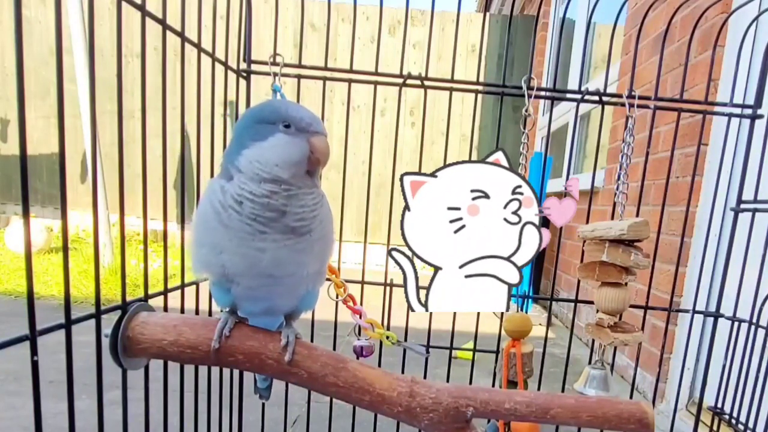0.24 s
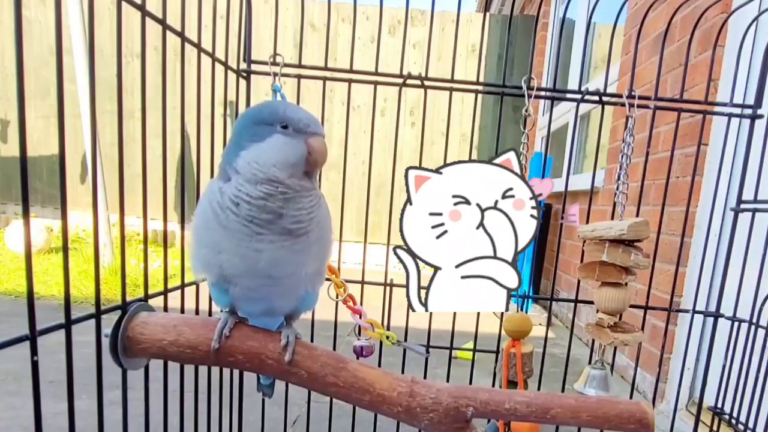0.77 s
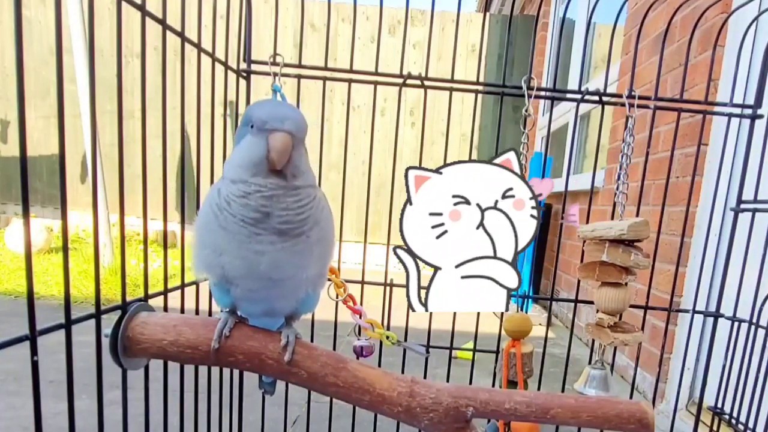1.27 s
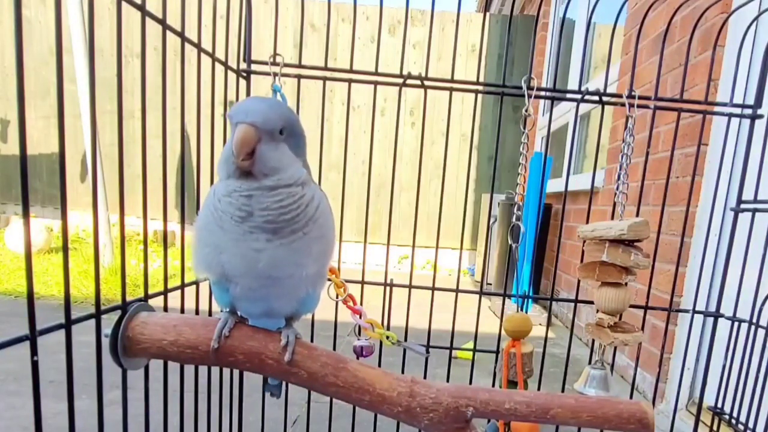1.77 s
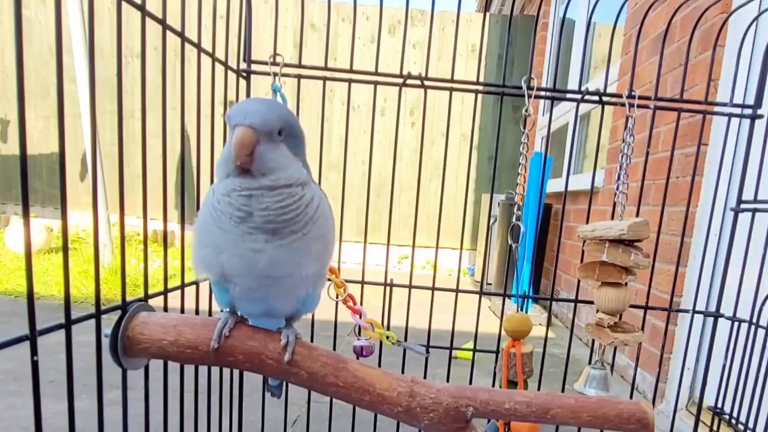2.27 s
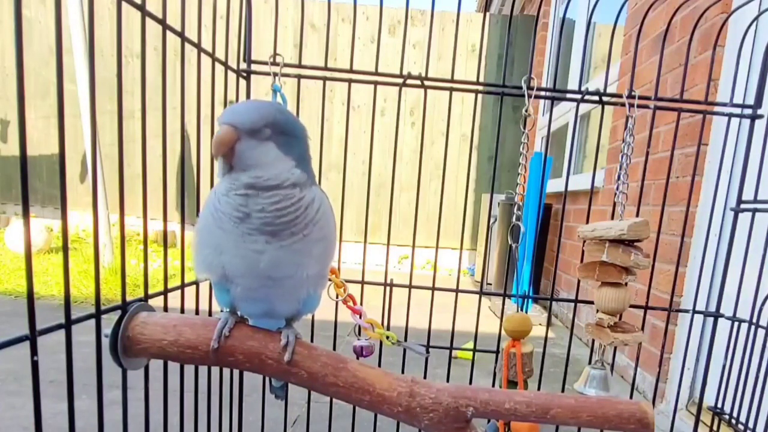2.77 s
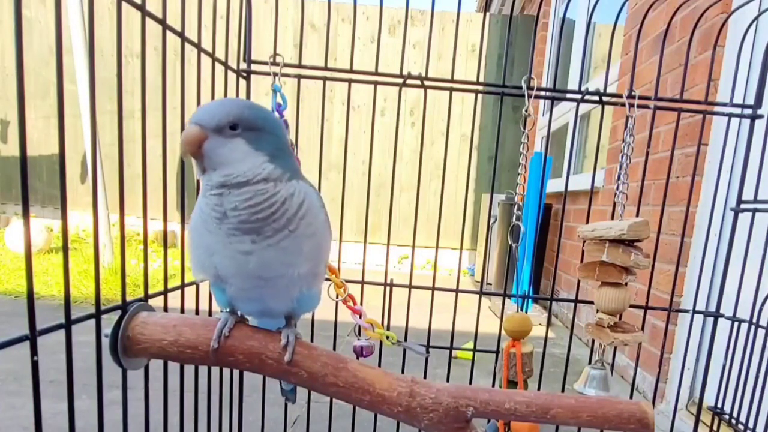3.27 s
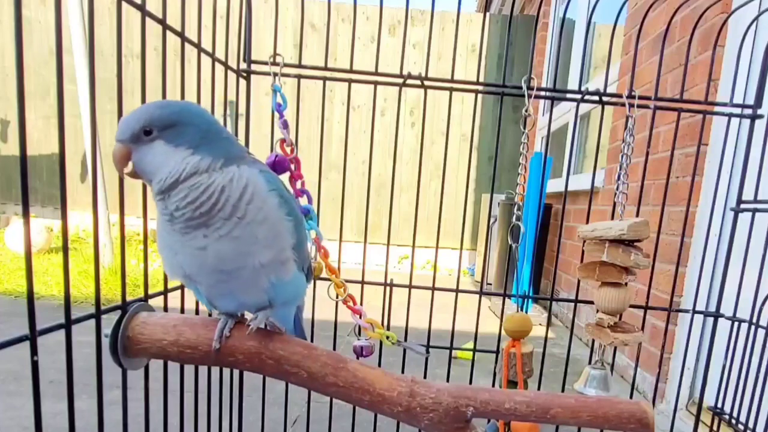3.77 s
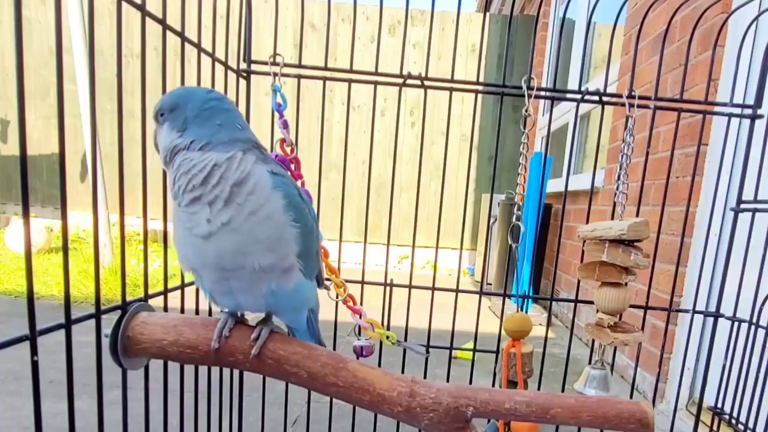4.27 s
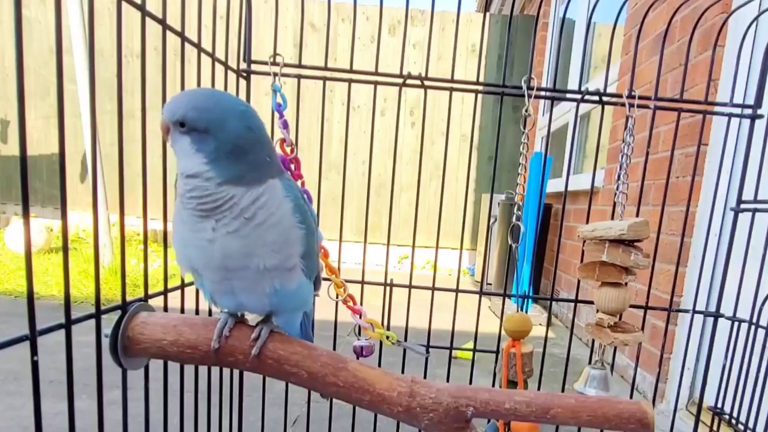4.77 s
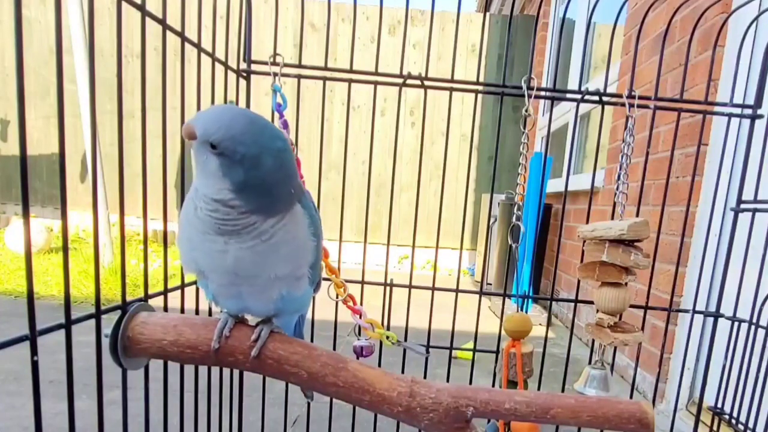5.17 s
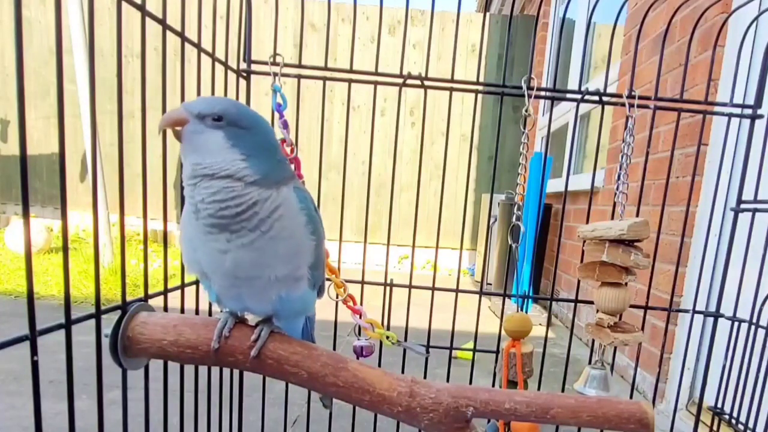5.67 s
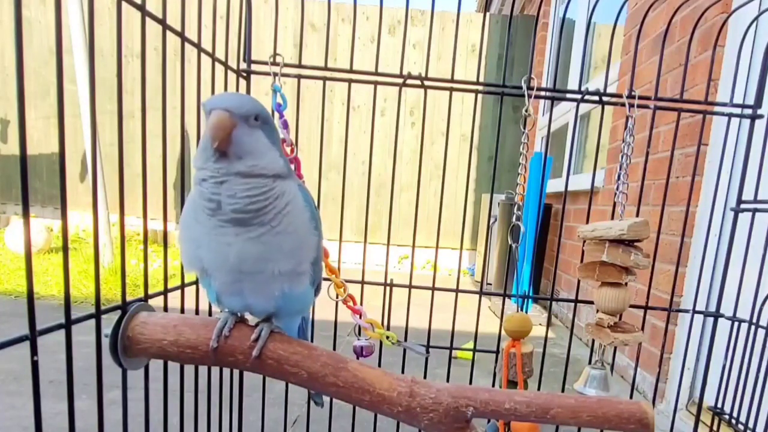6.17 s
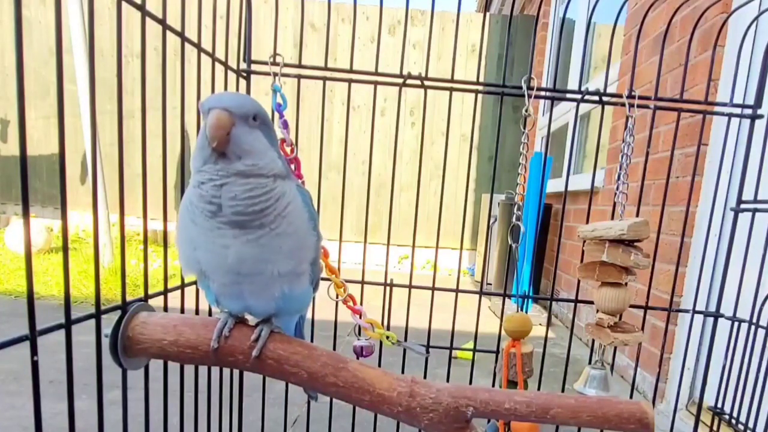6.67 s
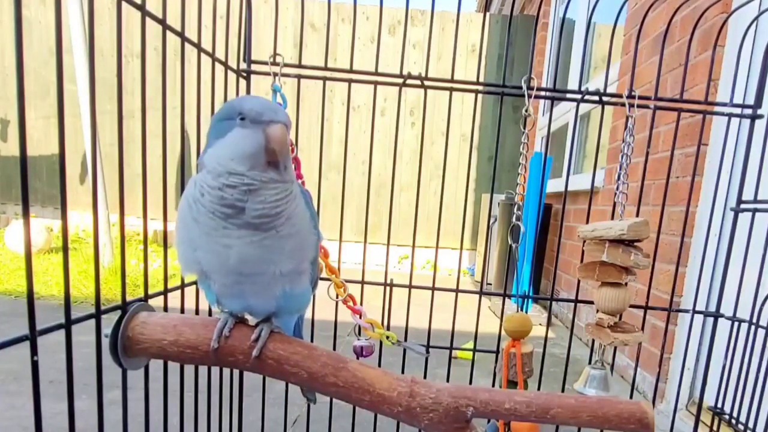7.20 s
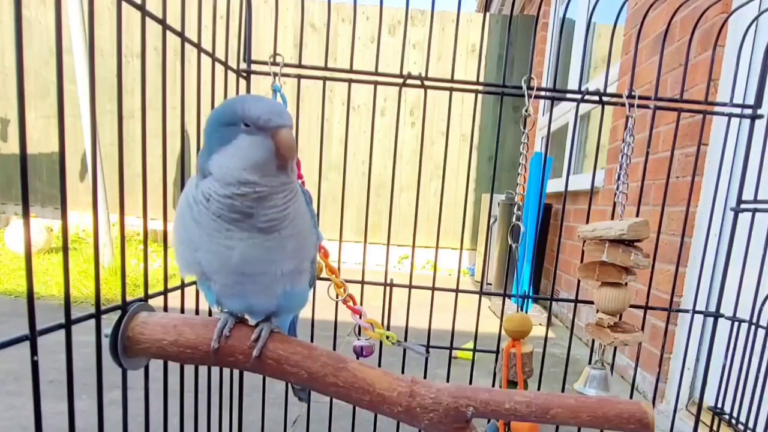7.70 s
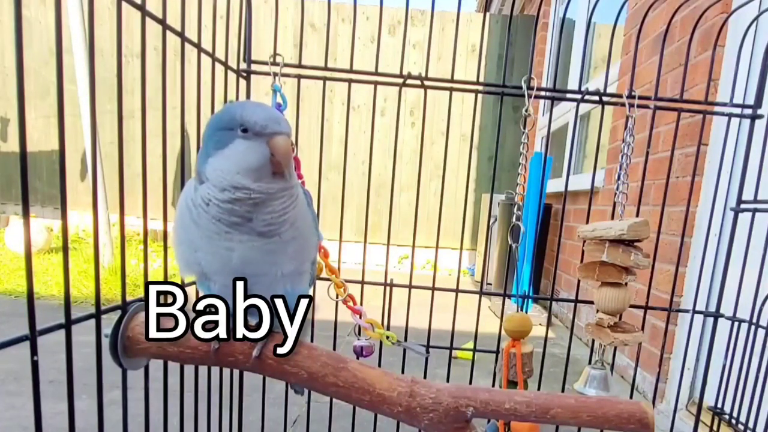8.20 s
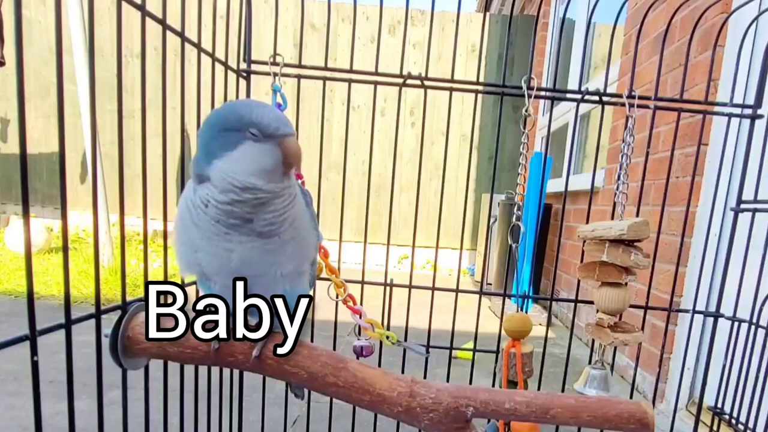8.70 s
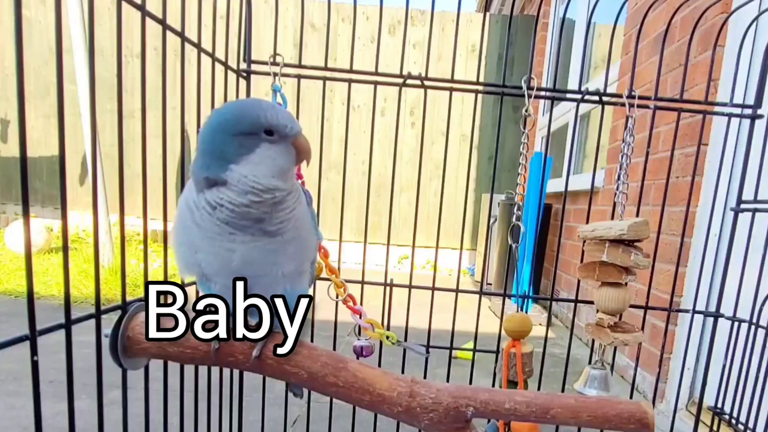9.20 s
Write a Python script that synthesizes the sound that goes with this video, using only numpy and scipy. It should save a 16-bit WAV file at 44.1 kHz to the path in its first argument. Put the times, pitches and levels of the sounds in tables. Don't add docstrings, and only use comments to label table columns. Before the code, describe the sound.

A small parrot chatters very close to the microphones in an outdoor cage, slightly left: short croaks, clicks, raspy squawks, a bright squeal, then a hollow whistle and a round hoot. Calls thin out after six seconds, leaving two rough grates near eight. Low street rumble and a passing engine drone lie beneath, with faint echoing sparrows, late feather rustle and a second engine revving.

```python
import sys
import numpy as np
from scipy import signal
from scipy.fft import rfft, irfft
from scipy.io import wavfile
from scipy.ndimage import uniform_filter1d

SR = 44100
rng = np.random.default_rng(int(sys.argv[2]) if len(sys.argv) > 2 else 0)


def dump(signal):
    limited = np.clip(np.atleast_2d(signal).T, -1, 1)
    pcm = np.round(limited * 32767).astype(np.int16)
    wavfile.write(sys.argv[1], SR, pcm)


def to_linear_factor(level_db):
    exponent = np.asarray(level_db, float) / 20
    return 10 ** exponent


N = 416744

# t/s, rumble level/dB, distant roar level/dB
STREET = [(0, -51, -67), (1.1, -47.5, -56), (2.102, -45, -62), (3.5, -48.5, -67), (4.7, -41.5, -60.5),
          (6.6, -50.5, -68.5), (7.2, -49.5, -70.5), (7.7, -45.5, -66), (9.5, -44, -67.5)]
# f/Hz, level/dB per Hz
RUMBLE = [(12, -53.5), (20, -30.5), (70, 3), (92, -12), (129, -9), (600, -28), (780, -60), (1320, -120)]
ROAR = [(180, -18), (400, -22.5), (700, -27), (1600, -34.5), (2300, -46.5), (4300, -47), (16000, -71)]
# f/Hz, left-right correlation
LIKENESS = [(60, 0.91), (290, 0.93), (640, -0.5), (1400, -0.37), (3100, 0)]
# t/s, firing f/Hz, level/dB, tilt/dB per order
PASSING = [(0, 68.5, -54.5, -3), (1.1, 68.78, -47.5, -4), (1.4, 68.8, -48, -15), (2.1, 62.74, -36, -17.5),
           (2.7, 59.7, -38.5, -6), (3.3, 56.8, -40.5, -7), (3.8, 52.97, -52.5, -3.5),
           (4.8, 50.55, -82.5, 9)]
REVVING = [(8.4, 47.96, -61.5, 2), (8.6, 48.08, -44, 1), (8.7, 54.01, -56, 3), (8.95, 54.64, -68.5, 5.5),
           (9.05, 49.23, -51.5, 0), (9.17, 50.93, -51, -0.5), (9.27, 61.4, -45.5, -1),
           (9.6, 63.7, -43.5, -1.5)]
HUM = [(0, 308, -61, -30), (1.7, 299.5, -58.5, -30.5), (3.4, 280.8, -58, -30.5), (3.9, 279, -75, -30)]
RISING = [(0, 77.65, -50, -30), (.9, 94.3, -53, -30), (1.2, 97, -70, -30)]

# f/Hz, level/dB
THROAT = [(700, -4.5), (2200, 0), (3300, -3.5), (4300, -2.5), (6000, -14), (7800, -3.5), (9800, -9.5),
          (12000, -2), (15500, -22.5)]
# t/s, lead of the left port/samples, left-right level/dB
HEAD = [(0, 10.26, 3.5), (1.5, 11.44, 10.5), (3.2, 12.54, 12.5), (4.3, 14.46, 9.5), (5.4, 13.55, 10.5),
        (6.3, 12.96, 8.5), (8, 11, 7.5)]
# f/Hz, t60/s
WALL = [(500, 0.38), (2500, 0.42), (3800, 0.52), (5500, 0.3), (12000, 0.26)]
# f/Hz, level/dB
BRICK = [(1000, -2), (4300, -0.5), (5300, -6.5), (8000, -1)]
BEND = 0.02

# t/s, length/s, peak effort level/dB, first f/Hz, last f/Hz
CLICKS = [(.445, 0.0055, -47, 910, 930), (.549, 0.0054, -26, 1630, 1640), (.568, .006, -34, 1940, 2050),
          (.584, 0.005, -30.5, 2000, 2050), (1.69, .006, -42, 3512, 3400), (1.955, .006, -40.5, 3489, 3400),
          (2.612, .005, -48, 3500, 3400), (2.042, 0.016, -29, 3913, 3890), (5.079, .017, -24, 1880, 1815),
          (7.861, 0.0078, -32, 2924, 2956)]
RASPS = [(1.478, 0.0081, -29.5, 1308, 1200), (1.596, 0.019, -28.5, 1900, 1015),
         (1.743, 0.023, -24.5, 2290, 1423), (2.069, 0.035, -16.5, 4265, 1937),
         (2.208, 0.016, -27.5, 943, 830), (2.351, 0.034, -15.5, 3857, 2230),
         (2.657, 0.014, -10.5, 3705, 3450), (2.967, 0.0047, -20.5, 2220, 2180),
         (2.976, 0.013, -18, 2386, 1542), (5.373, .014, -15.5, 4300, 2200)]
HISSES = [(4.785, 0.059, -21.5, 2694, 2014), (5.343, .075, -18, 3310, 2080)]
PIPS = [(.554, 0.0178, -47, 1423, 1960), (.585, 0.0088, -45.5, 1970, 2198)]
GRATES = [(7.872, 0.0402, -23, 245.4, 195.3), (7.969, 0.0638, -12.5, 392.7, 368.2)]
CROAKS = [(4.605, .045, -30.5, 560, 792), (5.015, 0.053, -38.5, 700, 545), (.205, .024, -30, 1050, 1600)]
SWELLS = [(1.895, 0.032, -25, 536, 705), (2.535, 0.026, -24.5, 728, 883), (2.815, 0.038, -29, 678, 738.3)]
ARCHES = [(1.616, 0.04, -18.5, 1010, 1019), (2.225, 0.03, -9, 680, 714.5)]
TAILS = [(1.486, 0.0393, -42, 755, 850), (2.102, 0.031, -29, 792, 661)]
DROPS = [(0, 0.023, -41, 1475, 710), (.226, 0.013, -30.5, 1430, 780), (.399, 0.025, -23.5, 1312, 631)]
SAGS = [(1.76, 0.042, -20.5, 1150, 800)]
GRATE_ROUGH = (.45, .34, .45)
# its syllables, then rise and fall of effort, pitch arch,
# roughness at (start, peak, end), beak and chest level/dB, chest filling as effort drops
KINDS = [ (CLICKS, dict(rise_s=0.0011, rise_share=0, rise_db=3, fall_db_per_s=1200, close_db=2, arch=0, rough=(0.27, 0.87, 0.71),
         beak_db=-8, chest_db=3, fill=0.33)),
         (PIPS, dict(rise_s=0.0028, rise_share=0, rise_db=0, fall_db_per_s=102, close_db=-12, arch=0, rough=(0.26, 0.38, 0.3),
         beak_db=-12, chest_db=6, fill=0.088)),
         (RASPS, dict(rise_s=0.0045, rise_share=0.15, rise_db=1, fall_db_per_s=348, close_db=1, arch=0, rough=(0.96, .85, 0.53),
         beak_db=-8.5, chest_db=-5, fill=0.37)),
         (GRATES, dict(rise_s=0.008, rise_share=0.12, rise_db=3, fall_db_per_s=253, close_db=3.5, arch=0, rough=GRATE_ROUGH, beak_db=-8.5, chest_db=-5, fill=0.9)),
         (HISSES, dict(rise_s=0, rise_share=0.51, rise_db=26.5, fall_db_per_s=59, close_db=-1.5, arch=0, rough=(.8, 0.82, .7),
         beak_db=-13.5, chest_db=-1.5, fill=0.35)),
         (CROAKS, dict(rise_s=0, rise_share=0.66, rise_db=22, fall_db_per_s=104, close_db=8.5, arch=0, rough=(0.96, 0.76, 0.88),
         beak_db=-5.5, chest_db=-3.5, fill=0.55)),
         (SWELLS, dict(rise_s=0, rise_share=0.76, rise_db=19.5, fall_db_per_s=3.5, close_db=-3, arch=0, rough=(0.53, 0.26, 0.49),
         beak_db=-0.5, chest_db=2, fill=0.52)),
         (ARCHES, dict(rise_s=0, rise_share=0.47, rise_db=14.5, fall_db_per_s=-5, close_db=4.5, arch=.06, rough=(0.43, .15, 0.5),
         beak_db=-2.5, chest_db=-1, fill=0.93)),
         (TAILS, dict(rise_s=0.0047, rise_share=0, rise_db=6.5, fall_db_per_s=198, close_db=-1.4, arch=0.042, rough=(0.29, 0.42, 0.19),
         beak_db=-1.5, chest_db=2.5, fill=0.61)),
         (SAGS, dict(rise_s=.008, rise_share=0, rise_db=12, fall_db_per_s=200, close_db=5.5, arch=-.12, rough=(.55, 0.35, 0.28),
         beak_db=2, chest_db=3, fill=.7)),
         (DROPS, dict(rise_s=0.0096, rise_share=0, rise_db=6, fall_db_per_s=602, close_db=-1.5, arch=0.1214, rough=(0.7, 0.51, 0.68),
         beak_db=-1.5, chest_db=-4, fill=0.46)), ]
CHEST_PER_OCTAVE_DB, CHEST_HZ = 18, 1500
EASY_DB, CHEST_TOP_DB = -25, 15.5

# t/s, effort level/dB, f/Hz, throat hollow level/dB
SQUEAL = [(2.67, -9, 1123, -24), (2.69, -7.5, 1123, -16), (2.71, -34, 750, 4), (2.73, -44, 696, -9.5)]
SCOOP = [(2.986, -23, 577, -8), (3.02, -39, 553, 10), (3.06, -47, 445, 13), (3.096, -34, 518, 3),
         (3.128, -18, 731, -8.5), (3.148, -19, 737, -2), (3.18, -13.5, 1135, -8), (3.215, -26.5, 1122, 4.5),
         (3.245, -38.5, 1097, -7.5)]
BARK = [(3.791, -20, 1608, -3.5), (3.798, -13.5, 1733, -7), (3.818, -25, 489, 0), (3.845, -69, 487, -21)]
GROAN = [(6.345, -33, 550, -4.5), (6.353, -25.5, 546.3, -3), (6.378, -20, 507.5, -4),
         (6.397, -31, 478, 7.5)]
SLIDE = [(4.258, -46, 1195, 9), (4.275, -25, 1215, -2), (4.3, -28.5, 807.3, 3.5), (4.335, -25.5, 586.6, -1),
         (4.372, -33, 448.5, 6)]
WHISTLE = [(5.408, -30.5, 739, 0.5), (5.422, -17, 738, -6), (5.436, -29, 870, 14.5),
           (5.5, -35.5, 908, 18.5), (5.537, -34.5, 904, 20.5), (5.565, -27, 957.6, 7),
           (5.625, -20, 955.5, 2), (5.71, -29, 834, 11), (5.785, -58, 490, 14.5)]
HOOT = [(6.258, -45, 818, 13), (6.275, -18, 790, -1), (6.3, -9.5, 728, -10.5), (6.33, -15.5, 702, -9.5),
        (6.345, -49.5, 690, -13.5)]
MUTTER = [(4.842, -33, 573, 4.2), (4.862, -37.5, 630, 11.3), (4.89, -47, 660, 16.2), (4.928, -50, 536, 20)]
SLUMP = [(2.395, -34.5, 1653, 7.4), (2.408, -33, 850, 5), (2.432, -36.5, 795, 8.7)]
# call, roughness inside, at the start, at the end,
# beak level/dB, beak change by the end/dB, beak share of the hollow
CALLS_SUNG = [
    (SQUEAL, 0.091, 0.31, 0.7, -3.5, -3.5, .01),
    (SCOOP, 0.14, 0.48, 0.11, -6.5, 1.97, .01),
    (BARK, 0.36, 0.24, 0.82, -7.5, -1.04, 0.0091),
    (SLIDE, 0.43, 0.37, .32, -33, 20.5, .01),
    (WHISTLE, 0.006, 0.51, 2.2, -2.5, -2.5, 0.78),
    (HOOT, .04, 0.1676, 0.98, -14.5, 4, .01),
    (MUTTER, .14, .5, .3, -3, 5, .01),
    (GROAN, 0.14, 1.8, 0.6, -12.5, 0.92, 0.012),
    (SLUMP, .2, 0.46, 0.34, -2.5, 1.5, .01),
]
EDGE_S = 0.016

# t/s, length/s, level/dB, first f/Hz, last f/Hz
SCREAMS = [(0.191, 0.022, -42, 8400, 8500), (.192, .018, -49, 3600, 3000), (4.765, 0.029, -47, 4000, 3600),
           (2.073, 0.048, -22, 4328, 1787), (2.35, 0.05, -17, 4400, 1500), (4.783, 0.07, -24.5, 5600, 4303),
           (5.349, 0.093, -17.5, 5000, 4100), (5.406, .035, -40, 10730, 10400),
           (5.63, 0.071, -28.5, 8800, 8300)]
SCREAM_WIDTH_HZ = 1300
# t/s, length/s, first f/Hz, last f/Hz, lift level/dB
RINGS = [(.0, 0.025, 1300, 750, 5), (.226, 0.013, 1400, 800, 9.5), (.552, .045, 1610, 2000, 6.5),
         (1.484, 0.033, 2970, 3400, 22), (1.62, .04, 3230, 3150, 5.5), (1.62, .04, 4306, 4200, 5),
         (1.755, 0.025, 4800, 3880, 12), (1.77, 0.023, 1800, 1610, 1), (2.228, 0.026, 2120, 2170, 5),
         (2.251, .012, 2650, 2600, 10), (2.352, 0.011, 2600, 2600, 5), (.4, 0.025, 4200, 2620, 7.5),
         (.208, 0.027, 2500, 3230, 9.5), (2.228, 0.026, 4300, 4300, 8.5), (2.535, .03, 3900, 4140, 4),
         (2.67, .035, 2300, 2090, 7), (2.82, .035, 3500, 3800, 9.5), (3.1, 0.058, 3200, 3800, 6.5),
         (3.15, 0.037, 3300, 4200, 3.5), (4.262, 0.027, 2300, 2200, 9), (4.29, 0.065, 2500, 2000, 6),
         (4.8, .045, 2303, 2000, 2), (5.08, 0.022, 2000, 2005, 5.5), (5.345, 0.063, 3300, 2600, 3),
         (5.363, 0.024, 4300, 4170, 12), (5.372, 0.057, 2150, 2150, 9), (5.6, .1, 3860, 3494, 1.5),
         (5.425, 0.13, 1720, 1900, 9), (5.585, 0.15, 1930, 1640, 9), (4.845, .08, 1260, 1150, 3),
         (6.265, 0.077, 2400, 2150, 2.5), (6.29, 0.043, 7400, 7100, 9.5), (6.368, .03, 2100, 2000, 4.5),
         (6.368, 0.029, 3150, 3000, 7.5), (6.36, .035, 7100, 6660, 13), (7.872, 0.048, 2200, 2140, 3.5),
         (7.872, 0.039, 4160, 4160, 11.5), (7.98, 0.042, 2500, 2700, 9), (7.972, 0.062, 4260, 4300, 9),
         (7.972, .03, 7200, 7200, 7.5)]
# t/s, length/s, first f/Hz, last f/Hz, lift level/dB
GAPS = [(.0, 0.025, 2300, 1800, -3), (0.5, .025, 5800, 5800, -11), (1.6, 0.058, 1940, 1800, -6),
        (1.6, .06, 6000, 6300, -13), (2, 0.017, 1000, 601.7, -9), (2.095, .045, 7500, 7500, -12),
        (2.5, 0.017, 1300, 1396, -5.5), (2, 0.05, 1096, 698, -17.5), (2.5, .04, 7004, 7007, -9.5),
        (2.5, 0.041, 5785, 5800, -4.5), (3.0, 0.15, 6500, 6600, -13), (4.26, 0.11, 5096, 4900, -9.5),
        (4.5, 0.039, 2200, 1000, -9), (5.5, 0.057, 1200, 890, -9.5), (5.5, .12, 5210, 5620, -12),
        (6, 0.13, 5630, 5200, -6), (5.5, .065, 5000, 4520, -8), (6, .06, 6950, 6200, -11),
        (5.44, 0.1, 3689, 3930, 1.5), (2.4, .035, 1700, 1600, -5), (1.9, 0.024, 1500, 1702.5, -1),
        (2.5, 0.031, 8190, 8020, 6), (2.657, .04, 8310, 7970, 6), (8.5, 0.061, 5240, 5220, 3.5),
        (4.5, 0.058, 6760, 6583, 10.5), (4, .115, 9450, 9540, -12.5), (5, .04, 6000, 6014, -15),
        (4.5, .02, 6000, 6020, -12), (3, 0.084, 4720, 5200, -4.5), (7, .085, 9600, 8500, -2),
        (6, 0.061, 1500, 1300, -5), (6.5, 0.042, 1100, 1000, -6), (6, .05, 5330, 5300, -9),
        (8, 0.074, 1700, 1300, -4)]
RING_WIDTH_HZ, GAP_WIDTH_HZ, TONGUE_S = 260, 670, 0.0035

# t/s, length/s, first f/Hz, last f/Hz,
# level/dB
SPARROWS = [(0.855, 0.12, 4730, 2845, -59.5), (3.67, 0.079, 6050, 4420, -72.5),
            (6.201, 0.051, 5440, 4190, -68.5), (4.157, 0.011, 1703, 1810, -54.5),
            (7.007, 0.096, 5380, 3850, -77.5), (7.451, 0.14, 6090, 5030, -79),
            (7.49, 0.15, 4460, 2987, -58), (8.309, 0.081, 5570, 4460, -73),
            (8.421, 0.18, 4673, 2980, -57.5), (8.97, .04, 5500, 5100, -76), (9.356, 0.045, 5520, 3980, -67)]
# t/s, level/dB
RUSTLE = [(8.402, -86), (8.68, -84), (8.75, -73.5), (9, -77), (9.03, -87), (9.34, -89.5)]


def evened(x):
    return x / np.sqrt(np.mean(x ** 2) + 1e-20)


def steadied(x):
    return x / np.sqrt(abs(uniform_filter1d(x ** 2, size=260)) + 1e-9)


def read(points, hz):
    f, value = np.transpose(points)
    return np.interp(np.log(hz + 1), np.log(f + 1), value)


def curves(rows):
    s, *columns = np.transpose(rows)
    t = np.arange(s[0], min(s[-1], N / SR), 1 / SR)
    return [np.interp(t, s, c) for c in columns]


def add(mix, s, sound):
    part = mix[..., round(s * SR):][..., :sound.shape[-1]]
    part += sound[..., :part.shape[-1]]


def wobble(n, size):
    noise = rng.standard_normal(n + 2 * size)
    smooth = uniform_filter1d(uniform_filter1d(noise, size), size)
    return evened(smooth)[size:-size]


def echoes(x, t60, start_s):
    taps = np.zeros((2, SR))
    grid = np.arange(round(start_s * SR), SR - 20, 20)
    at = grid + rng.integers(0, 20, (2, len(grid)))
    np.put_along_axis(taps, at, rng.choice([-1., 1.], (2, len(grid))), 1)
    hz, t, z = signal.stft(taps, SR, nperseg=256)
    decay = to_linear_factor(-60 * t / read(t60, hz)[:, None])
    tail = signal.istft(z * decay, SR, nperseg=256)[1]
    tail = tail[:, :round(1.2 * max(s for _, s in t60) * SR)]
    return signal.oaconvolve(x[None], tail / np.linalg.norm(tail[0]), axes=1)[:, :N]


def street_noise(spectrum, column, patchy_db, count):
    frames, hz = N // 512 + 5, np.fft.rfftfreq(2048, 1 / SR)[:count]
    a, b, c, d, patches = rng.standard_normal((frames, count, 5)).T
    patches = uniform_filter1d(patches, size=4, axis=0)
    patches = evened(uniform_filter1d(patches, size=12, axis=1))
    same = np.clip(read(LIKENESS, hz), -1, 1)[:, None]
    left = a + 1j * b
    right = same * left + np.sqrt(1 - same ** 2) * (c + 1j * d)
    z = np.array([left, right]) * to_linear_factor(read(spectrum, hz)[:, None] + patchy_db * patches)
    z = np.pad(z, ((0, 0), (0, 1025 - count), (0, 0)))
    noise = signal.istft(z, nperseg=2048, noverlap=1536)[1][:, :N]
    table = np.transpose(STREET)
    level_db = np.interp(np.arange(N) / SR, table[0], table[column])
    return to_linear_factor(level_db) * evened(noise)


def engine(rows):
    out = np.zeros(N)
    hz, level_db, tilt_db = curves(rows)
    turns = np.cumsum(hz * (1 + 0.0048 * wobble(len(hz), size=2000))) / SR
    for order in (1, 2, 3, 4):
        db = level_db + tilt_db * (order - 1) - 9 * (order > 3)
        waver_db = 1.9 * wobble(len(hz), size=3000)
        tone = np.sqrt(2) * np.sin(2 * np.pi * order * turns)
        add(out, rows[0][0], to_linear_factor(db + waver_db) * tone * np.minimum(turns / 4, 1))
    return out


def syllable(start, length, peak_db, first_hz, last_hz, rise_s, rise_share, rise_db, fall_db_per_s,
             close_db, arch, rough, beak_db, chest_db, fill):
    t = np.linspace(0, length, num=16)
    top = min(rise_s + rise_share * length, .9 * length)
    after = np.maximum(t - top, 0)
    effort_db = peak_db - rise_db * np.maximum(1 - t / (top + 1e-6), 0)
    effort_db -= fall_db_per_s * after + close_db * (after / (length - top)) ** 2
    glide = first_hz * (last_hz / first_hz) ** (t / length)
    hz = glide * (1 + arch * np.sin(np.pi * t / length))
    chest = np.minimum(fill * (EASY_DB - effort_db), CHEST_TOP_DB)
    chest -= CHEST_PER_OCTAVE_DB * np.maximum(np.log2(hz / CHEST_HZ), 0)
    rough = np.interp(t, [0, top, length], rough)
    return np.transpose([start + t, effort_db, hz, rough, chest_db + chest, beak_db + 0 * t])


def voiced(drive, effort_db, chest_db, beak_db, low_hz):
    hz = np.fft.rfftfreq(len(drive), 1 / SR)
    z = rfft(drive) * to_linear_factor(read(THROAT, hz)) / (1 + (low_hz / (hz + 1)) ** 8)
    shut_db = np.minimum(np.average(beak_db, weights=to_linear_factor(effort_db)), 0)
    z *= to_linear_factor(0.95 * shut_db * np.maximum(hz - 8000, 0) / 4000)
    low = 1 / (1 + (hz / 2000) ** 12)
    high = 1 / (1 + (5000 / (hz + 1)) ** 12)
    bands = (low, chest_db), (1 - low - high, 0), (high, beak_db)
    out = sum(to_linear_factor(effort_db + db) * steadied(irfft(z * band, len(drive))) for band, db in bands)
    edge = np.arange(len(out))
    return out * np.minimum(1, np.minimum(edge / 40, edge[::-1] / 400) ** 2)


def note(rows):
    effort_db, hz, rough, chest_db, beak_db = (np.pad(c, (0, 300), "edge") for c in curves(rows))
    rough = np.clip(rough, 0, 1)
    n = len(hz)
    drift = .004 * wobble(n, size=500)
    hz = uniform_filter1d(hz, size=120) * (1 + drift)
    jitter = (.004 + 0.11 * rough ** 1.2) * wobble(n, size=max(36, round(SR / hz.mean())))
    turns = np.cumsum(hz * (1 + jitter)) / SR
    beats = 0
    for k in range(1, min(40, int(16000 / hz.min()) + 1)):
        patchy_db = 4.5 * wobble(n, size=1500) * np.tanh(k / 8)
        drowned_db = -90 * rough * np.clip(k * hz - 2500, 0, 6000) / 10000 - 1.2 * max(k - 9, 0)
        partial = np.cos(2 * np.pi * (k * turns + .16 * rng.random()))
        beats = beats + to_linear_factor(patchy_db + drowned_db) * partial * (k * hz < 16000)
    puffs = (0.25 + np.exp(-(turns % 1) / 0.55)) * rng.standard_normal(n)
    puffs -= (1 - rough) * uniform_filter1d(puffs, size=9)
    air = .012 + .75 * rough
    drive = (1 - air) * steadied(beats) + air * evened(puffs)
    creak = np.cumsum(290 * (1 + .2 * drift / drift.std())) / SR % 1
    limp_db = 3.5 * (hz < 420) * np.cos(np.pi * turns)
    burst_db = limp_db + 2.6 * rough * wobble(n, size=24) + 15 * rough ** 2 * (0.5672 - creak)
    low_hz = np.clip(0.87 * hz.min(), 310, 520)
    return to_linear_factor(burst_db) * voiced(drive, effort_db, chest_db, beak_db, low_hz)


def tongue(start, sound):
    hz, t, z = signal.stft(sound, SR, nperseg=256, noverlap=192)
    lift_db = 0
    for table, width_hz in ((RINGS, RING_WIDTH_HZ), (GAPS, GAP_WIDTH_HZ)):
        for s, length, first_hz, last_hz, db in table:
            if start - length < s < start + t[-1]:
                late = t + start - s
                held = np.clip(np.minimum(late, length - late) / TONGUE_S + 1, 0, 1)
                centre = first_hz + (last_hz - first_hz) * np.clip(late / length, 0, 1)
                lift_db = lift_db + db * held * np.exp(-((hz[:, None] - centre) / width_hz) ** 2)
    tuned = z * to_linear_factor(lift_db)
    tuned *= np.linalg.norm(z, axis=0) / (np.linalg.norm(tuned, axis=0) + 1e-12)
    shaped = signal.istft(tuned, SR, nperseg=256, noverlap=192)[1][:len(sound)]
    return signal.sosfilt(signal.butter(3, 260, "high", fs=SR, output="sos"), shaped)


def scream(start, length, db, first_hz, last_hz):
    u = np.linspace(0, 1, round(length * SR))
    size = round(.5 * SR / SCREAM_WIDTH_HZ)
    phase = 2 * np.pi * np.cumsum(first_hz + (last_hz - first_hz) * u) / SR
    air = wobble(len(u), size) * np.cos(phase) + wobble(len(u), size) * np.sin(phase)
    grit = to_linear_factor(db + 3.0 * wobble(len(u), size=60))
    return start, grit * air * np.sin(np.pi * u ** 0.75) ** 2


def call(rows, clear, rough_start, rough_end, beak_db, opening_db, share):
    s = np.linspace(rows[0][0], rows[-1][0], num=80)
    times, *columns = np.transpose(rows)
    effort_db, hz, hollow_db = (np.interp(s, times, c) for c in columns)
    rough = clear + (rough_start - clear) * np.exp(-2 * (s - s[0]) / EDGE_S)
    rough += (rough_end - clear) * np.exp((s - s[-1]) / EDGE_S)
    beak = beak_db + opening_db * (s - s[0]) / (s[-1] - s[0]) + share * hollow_db
    return np.transpose([s, effort_db, hz, rough, hollow_db, beak])


def parrot():
    dry, ports = np.zeros(N), np.zeros((2, N))
    s, lead, pan_db = np.transpose(HEAD)
    sung = [syllable(*row, **rule) for table, rule in KINDS for row in table]
    sung += [call(*row) for row in CALLS_SUNG]
    sounds = [(rows[0][0], note(rows)) for rows in sung]
    sounds += [scream(*row) for row in SCREAMS]
    for start, sound in sounds:
        sound = tongue(start, np.pad(sound, (0, 64)))
        hz = np.fft.rfftfreq(len(sound), 1 / SR)
        delay_s = np.interp(start, s, lead) * (1 + BEND / (1 + (hz / 2500) ** 2)) / SR
        late = np.exp(-2j * np.pi * hz * delay_s)
        shadow = to_linear_factor(-np.interp(start, s, pan_db) * np.clip(hz / 5600, .3, .95))
        right = irfft(rfft(sound) * late * shadow, len(sound))
        add(ports, start, np.array([sound, right]))
        add(dry, start, sound)
    scattered = dry * (.45 + .8 * wobble(N, size=220))
    scattered = irfft(rfft(scattered) * to_linear_factor(read(BRICK, np.fft.rfftfreq(N, 1 / SR))), N)
    near = to_linear_factor(-12) * echoes(dry, [(500, .055), (12000, .04)], .001)
    return to_linear_factor(-1) * (ports + near) + to_linear_factor(-24.5) * echoes(scattered, WALL, 0.0089)


def sparrows():
    dry = np.zeros(N)
    for s, length, start_hz, end_hz, db in SPARROWS:
        u = np.linspace(0, 1, round(length * SR))
        hz = (start_hz + (end_hz - start_hz) * u) * (1 + .07 * wobble(len(u), size=100))
        add(dry, s, to_linear_factor(db) * np.sin(2 * np.pi * np.cumsum(hz) / SR) * np.sin(np.pi * u))
    return to_linear_factor(13) * echoes(dry, [(2000, 0.18), (6000, 0.86)], 0.00067)


def rustle():
    out, level_db = np.zeros((2, N)), curves(RUSTLE)[0]
    n = len(level_db)
    grains = rng.standard_normal((2, n)) * to_linear_factor(3.3 * wobble(n, size=900))
    colour_db = [(2500, -28.5), (5000, -7), (8000, -3.5), (12000, -11), (16000, -13.5)]
    colour = to_linear_factor(read(colour_db, np.fft.rfftfreq(n, 1 / SR)))
    add(out, RUSTLE[0][0], to_linear_factor(level_db + 8) * evened(irfft(rfft(grains) * colour, n)))
    return out


def scene():
    rumble = street_noise(RUMBLE, column=1, patchy_db=2.5, count=70)
    rumble = rumble + sum(engine(rows) for rows in (PASSING, REVVING, HUM, RISING))
    rumble = rumble * to_linear_factor([[-1.2], [1.2]])
    roar = to_linear_factor(7.5) * street_noise(ROAR, column=2, patchy_db=0.7, count=760)
    return rumble + roar + parrot() + sparrows() + rustle()


def top_cut(x):
    return signal.sosfilt(signal.butter(12, 16790, fs=SR, output="sos"), x)


def record(dry):
    limited = np.tanh(dry / 1.073)
    edge = signal.firwin(255, 16200, fs=SR)[None]
    mix = signal.oaconvolve(limited, edge, "same")
    return top_cut(mix)


dry = scene()
out = record(dry)
dump(out)
```